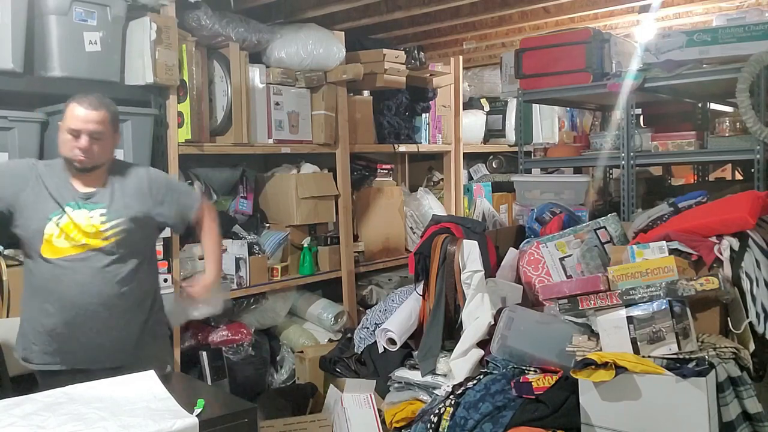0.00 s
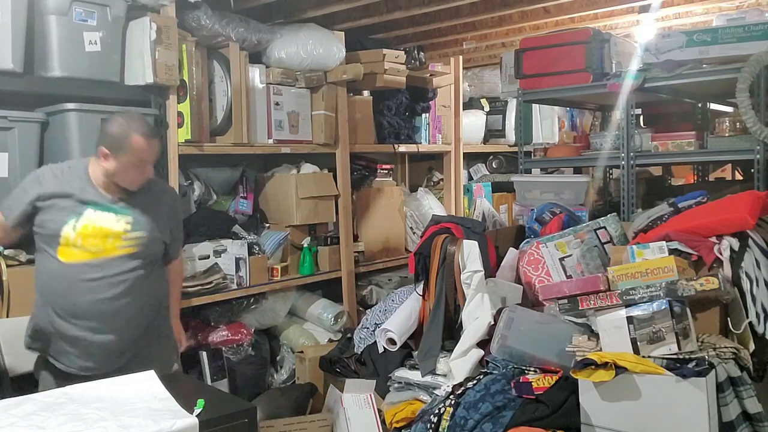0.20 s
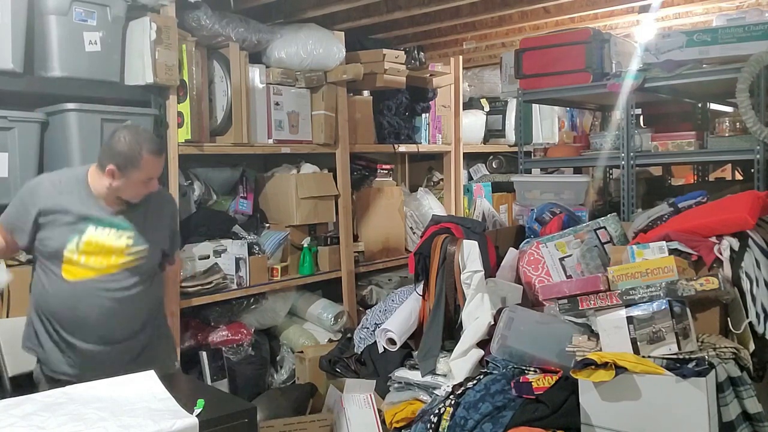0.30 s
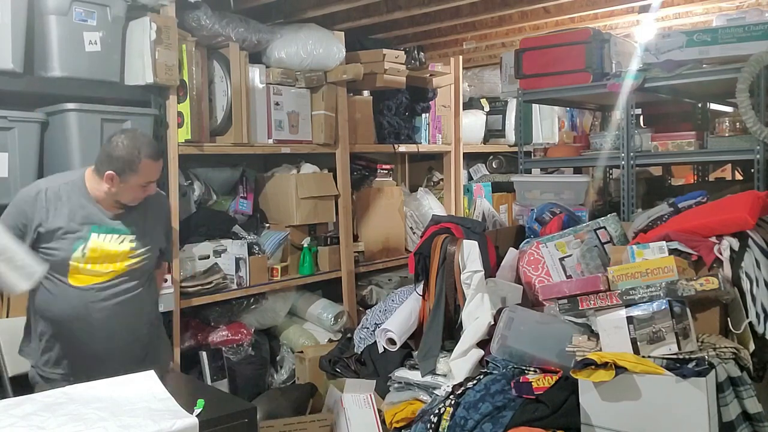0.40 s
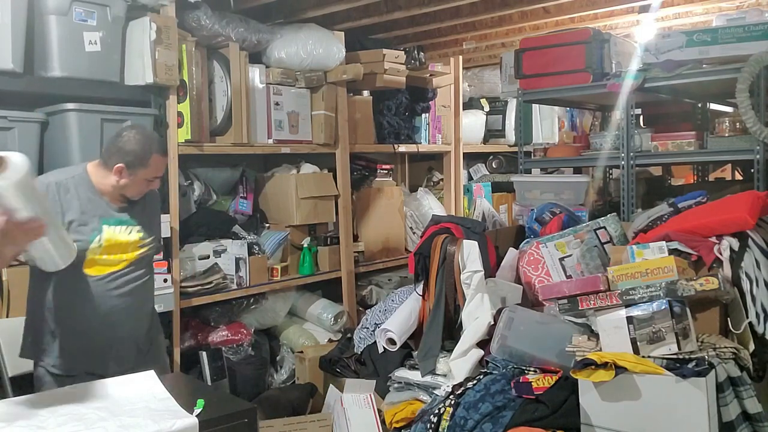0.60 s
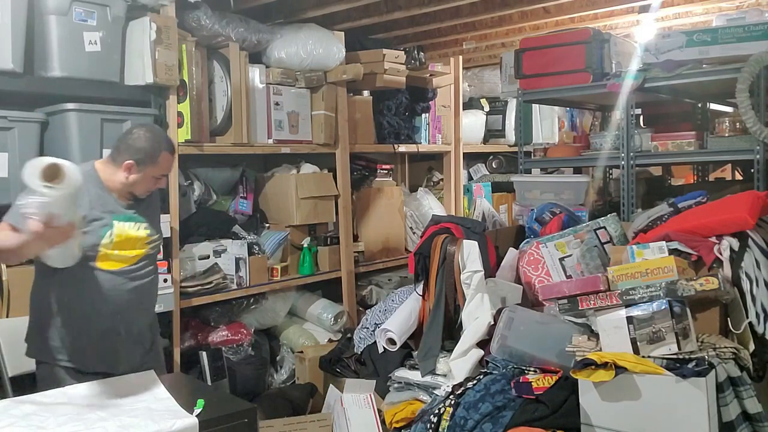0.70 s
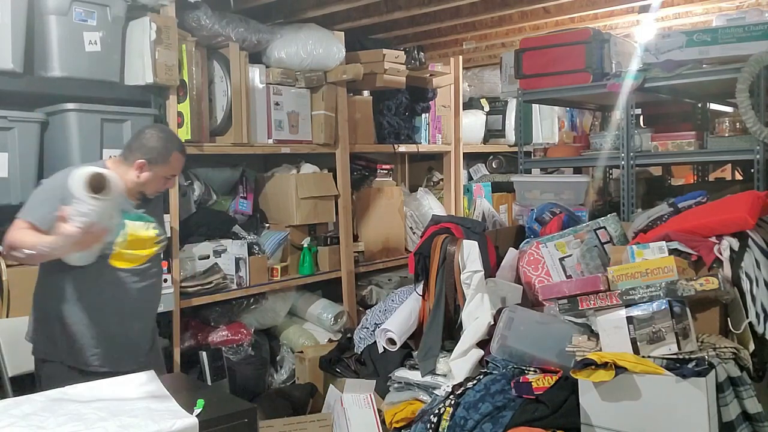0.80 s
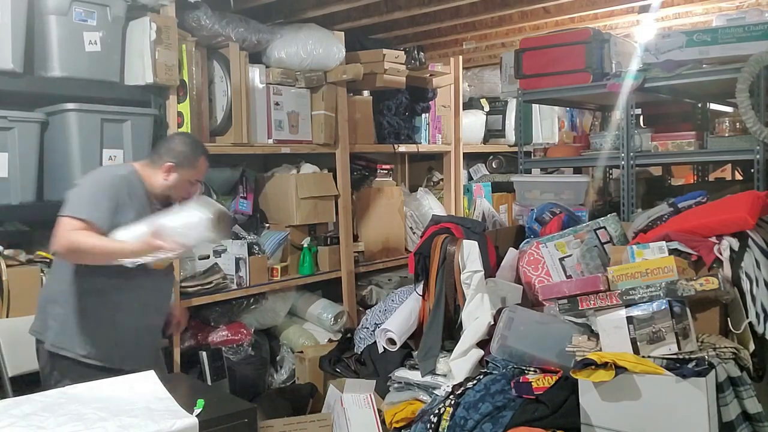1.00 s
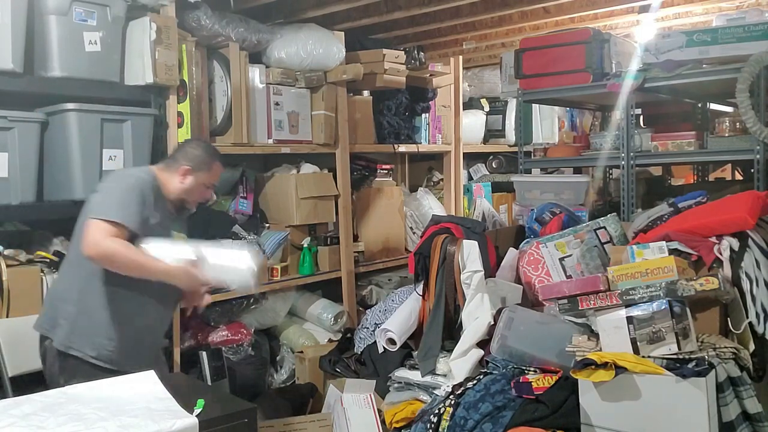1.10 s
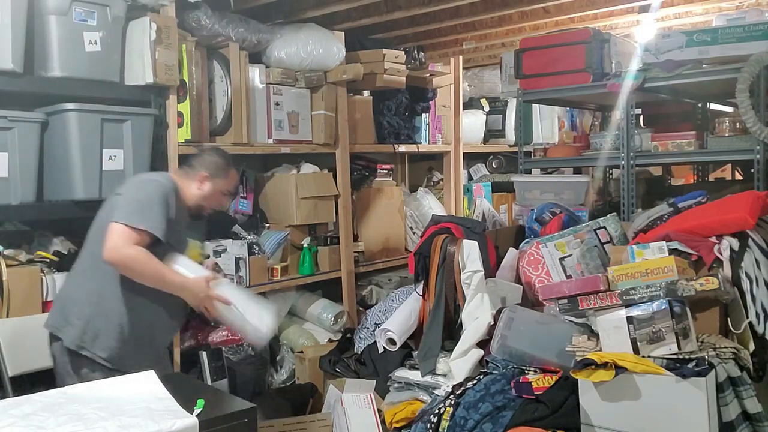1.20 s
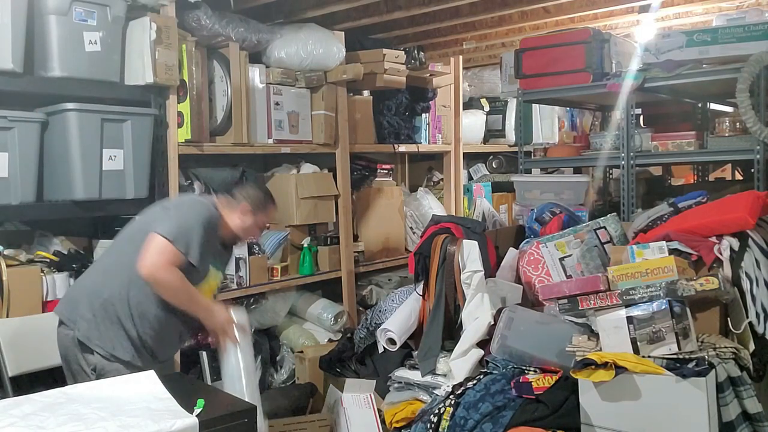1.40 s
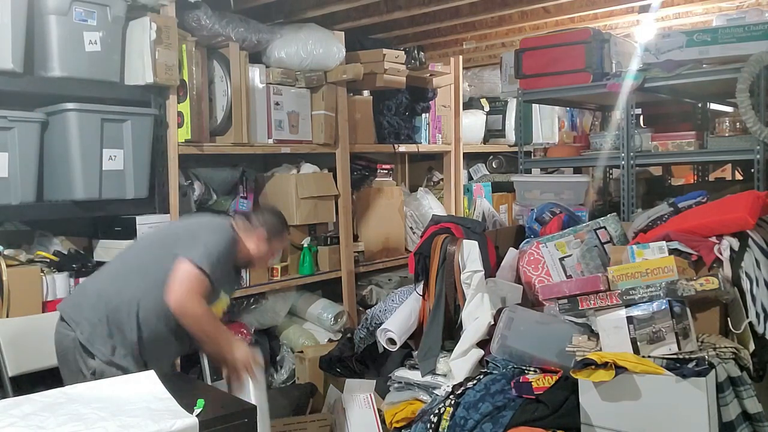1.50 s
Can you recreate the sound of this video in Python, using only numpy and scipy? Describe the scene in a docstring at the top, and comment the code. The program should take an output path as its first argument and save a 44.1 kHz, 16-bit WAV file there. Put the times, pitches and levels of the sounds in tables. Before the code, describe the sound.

A glass plate shatters after a brief swish of wrapping; a ringing crash, a heavy thud as the pieces land, then bouncing shards thinning out, close in a small cluttered storage room with faint fan hum.

```python
"""In a cluttered storage room a glass plate shatters: a dense crash in which the largest piece rings on,
then a heavy thud as the wreck lands, and shards that bounce and clink ever more thinly.
Glass is made of dying sine tones and gritty noise, knocks of tones and noise around one pitch.
Coloured noise gives the swish of wrapping before and after, a dull rumble and room air;
a fan is a faint, wavering sine hum."""
import sys
import numpy as np
from scipy import signal
from scipy.fft import rfft, irfft
from scipy.io import wavfile
from scipy.ndimage import uniform_filter1d

SR = 44100
rng = np.random.default_rng(int(sys.argv[2]) if len(sys.argv) > 2 else 0)


def waveform_to_disk(signal):
    """Save audio, clipped to [-1, 1], as 16-bit WAV at the path in sys.argv[1]."""
    frames = np.transpose(np.atleast_2d(signal))
    scaled = np.clip(frames, -1, 1) * 32767
    samples = np.round(scaled).astype(np.int16)
    wavfile.write(sys.argv[1], SR, samples)


N = 68355
TIME = np.arange(N) / SR  # seconds since the scene began
AGE = TIME[:2 ** 15]  # seconds since a single sound began
CUTOFF_HZ = 15900
SPREAD = 0.25  # usual strength of what differs between the ears, against what they share
ATTACK_S = .0004  # time constant of the onset of a struck sound

# Glass striking and cracking. Each row: start in seconds, level in dB, body level in dB against it,
# treble level in dB against it, basic t60 (time to fall by 60 dB) in seconds.
CLINKS = [(0.227, -21.5, -6.5, -3, 0.22), (0.232, -31, 10.5, 11, 0.27), (.243, -24, 6.5, 10, 0.023),
          (0.254, -16, -1.5, 1.5, 0.13), (0.265, -21, -2, 4, 0.078), (.277, -25.5, 6, 12, 0.1),
          (.294, -20, 2, 2, 0.15), (0.303, -21.5, -23, 6.5, 0.18), (0.3081, -16, -5.5, 3, 0.054),
          (.311, -15.5, 0, -2, 0.023), (.3195, -22.5, 6.5, 6.5, 0.14), (0.333, -18, -25, -10, 0.16),
          (0.3428, -27.5, 13.5, -6, 0.076), (.3485, -21.5, 13, 9, 0.031), (0.352, -19.5, 5.5, 2.5, 0.031),
          (.365, -29.5, -31, 2, 0.41), (.388, -22.5, -12, 2, 0.056), (0.403, -19, -11, 1.5, 0.042),
          (0.429, -35, 2, -8, 0.12), (0.447, -34, -15, -6, .1), (.459, -30, -4, 7.5, 0.063),
          (0.472, -17.5, -8, -0.5, 0.11), (0.477, -25, 2, 6, 0.14), (0.494, -25.5, -3, 4, 0.14),
          (.511, -25.5, -27, -3, 0.093), (0.538, -40, 10.5, 2, 0.45), (0.5554, -15.5, -6.5, -16.5, 0.035),
          (.592, -34.5, 0, 3, 0.061), (0.613, -30, -18, -6.5, 0.12), (0.6322, -25.5, -14, -1.5, 0.037),
          (.657, -38, -25, 4, 0.045), (0.68, -28, -7, -1, 0.033), (0.6848, -23.5, -13.5, -6.5, 0.064),
          (0.704, -44.5, 2, 3.5, 0.35), (0.7362, -20, -13, -10.5, 0.064), (0.753, -33, -8.5, -6.5, 0.21),
          (0.7893, -27.5, -46, -13.5, 0.12), (.812, -37, -3, -5, 0.11), (0.871, -42.5, -16, 6, 0.084),
          (.878, -38, -7, 5, 0.049), (0.909, -42.5, -14, 0.5, 0.18), (.943, -32, -22, -4, 0.15),
          (0.995, -37, -24, 1, 0.075), (1.041, -38.5, -26, -35, 0.074), (1.06, -37.5, -7, 4, 0.072),
          (1.073, -27.5, -23, -4, 0.089), (1.0995, -25.5, -21, -12, 0.041), (1.134, -50.5, 2.5, -18, 0.044),
          (1.142, -31.5, -12, -7.5, 0.049), (1.2278, -45, -10, -4, 0.064), (1.252, -41, -18, -22, 0.035),
          (1.301, -44, -29, -0.5, 0.061), (1.4697, -48, -27, -4.5, 0.22), (1.498, -43.5, -23, -12, 0.083),
          (1.5286, -51.5, -22, 7.5, 0.12)]


def amp(db):
    """Turns decibels into a gain."""
    return 10 ** (np.asarray(db) / 20)


def unit(x):
    """Scales a sound to an rms (average strength) of 1."""
    return x / np.sqrt(np.mean(x ** 2) + 1e-20)


def read(points, hz):
    """Reads a curve of (Hz, value) points, with straight lines over log frequency."""
    point_hz, value = np.transpose(points)
    return np.interp(np.log(hz + 1), np.log(point_hz), value)


def follow(points):
    """Turns (seconds, dB) points into a gain that moves over the whole scene."""
    return amp(np.interp(TIME, *np.transpose(points)))


def add(mix, s, sound):
    """Mixes a sound in at s seconds, cut off where the scene ends."""
    part = mix[:, max(round(s * SR), 0):][:, :sound.shape[-1]]
    part += sound[..., :part.shape[1]]


def colour(x, octave_db):
    """Filters white noise so that each octave gets the dB that octave_db gives for its frequency."""
    hz = np.fft.rfftfreq(x.shape[-1], 1 / SR)
    # white noise is stronger in higher octaves, as they are wider: the root evens this out
    gain = amp(octave_db(hz)) * np.sqrt(SR / np.sqrt(2) / (hz + 10))
    return irfft(rfft(x) * gain, x.shape[-1])


def pair(mid, side, spread=SPREAD):
    """Makes left and right from a common and a differing part."""
    return np.array([mid + spread * side, mid - spread * side]) / np.hypot(1, spread)


def noise(size, spread=SPREAD):
    """Makes white noise that differs between the ears by spread."""
    return pair(*rng.standard_normal((2, size)), spread)


def decay(t60):
    """Rises quickly, then falls exponentially by 60 dB every t60 seconds."""
    return (1 - np.exp(-AGE / ATTACK_S)) * np.exp(-np.log(1000) * AGE / max(t60, 1e-3))


def mode(hz, db, t60):
    """One way a struck object vibrates: a dying sine tone, slightly out of step between the ears."""
    lag = rng.choice([-1, 1]) * SPREAD * np.array([[1], [-1]])
    return np.sqrt(2) * amp(db) * decay(t60) * np.sin(2 * np.pi * hz * AGE + lag)


def fan():
    """A sine hum that wavers in pitch and strength, over the quiet noise of room air."""
    # The wavering hum. Each row: time in seconds, pitch in Hz, level in dB.
    hum_path = [(0, 406, -48), (.03, 402, -55), (.1, 383, -51), (.14, 395, -59), (.2, 390, -54),
                (1.19, 386, -54), (1.3, 405, -56), (1.45, 398, -55), (1.55, 420, -53)]
    # Room air. Each row: frequency in Hz, level in dB per octave.
    air_colour = [(25, -86), (60, -89), (250, -83), (550, -58), (1000, -94), (3000, -82), (8000, -97),
                  (16000, -95)]
    flutter_depth, flutter_hz, air_spread = .55, 28, 0.26
    when, hz, db = np.transpose(hum_path)
    # slow noise: little is left of it above flutter_hz
    flutter = unit(colour(noise(N), lambda f: -10 * np.log10(1 + (f / flutter_hz) ** 6)))
    strength = (1 + flutter_depth * flutter) / np.hypot(1, flutter_depth)
    phase = 2 * np.pi * np.cumsum(np.interp(TIME, when, hz)) / SR
    hum = np.sqrt(2) * amp(np.interp(TIME, when, db)) * strength * np.sin(phase)
    return hum + colour(noise(N, air_spread), lambda f: read(air_colour, f))


def wrapping():
    """Wrapping material slides and swishes: noise whose level trembles finely."""
    # The swishes. Each row: time in seconds, level in dB.
    swish_level = [(0, -57.5), (.04, -60.5), (.075, -51), (.103, -45.5), (.125, -60.5), (.16, -67.5),
                   (.22, -81.5), (1.3, -73), (1.42, -63.5), (1.5, -73), (1.55, -91)]
    # Their tone. Each row: frequency in Hz, level in dB per octave.
    swish_colour = [(100, -28), (500, -3.5), (1300, 1.5), (2500, 2.5), (6000, 6.5), (11000, 6),
                    (16000, 7.5)]
    spread, grain_db = 0.85, 1
    grain = unit(uniform_filter1d(rng.standard_normal(N), size=90))  # smoothed over about 2 ms
    swish = colour(noise(N, spread), lambda f: read(swish_colour, f))
    return swish * follow(swish_level) * amp(grain_db * grain)


def rumble():
    """Things shift on the floor from the crash on: low noise that rises and fades."""
    # The rumble. Each row: time in seconds, level in dB.
    rumble_level = [(0, -92), (.22, -88), (.3, -46), (.6, -52.5), (.9, -53.5), (1.15, -57), (1.55, -64.5)]
    # Its tone. Each row: frequency in Hz, level in dB per octave.
    rumble_colour = [(25, -11), (70, -11), (150, -2.5), (260, 0.5), (600, -10.5), (2000, -32.5)]
    return colour(noise(N), lambda f: read(rumble_colour, f)) * follow(rumble_level)


def splinters(t60=0.016, count=24):
    """Fine splinters patter at random: short ticks in groups, each group with a pitch of its own."""
    # The patter. Each row: time in seconds, level in dB.
    patter_level = [(.23, -34.5), (.3, -37.5), (.4, -40), (.52, -33), (.62, -47), (.8, -42), (.86, -53),
                    (1.1, -54), (1.25, -68.5), (1.55, -67)]
    # Its tone. Each row: frequency in Hz, change in dB per octave.
    patter_colour = [(100, -12.5), (400, -2), (1200, 2.5), (4500, -4), (10000, -3), (16000, -26)]
    ticks_per_s, scatter_db = 560, 4  # of all groups together; random strength of a tick
    tone_db, ring_s = -7.5, 0.066  # level and t60 of the pitched part before the patter is coloured
    out = np.zeros((2, N))
    for _ in range(count):
        strength = amp(scatter_db * np.minimum(rng.exponential(1, N), 3))
        ticks = (rng.random(N) < ticks_per_s / count / SR) * strength
        tone = mode(rng.uniform(1976, 14000), tone_db, ring_s)
        tick = noise(len(AGE), spread=0.19) * decay(t60) + tone
        out += signal.oaconvolve(ticks[None], tick, axes=1)[:, :N]
    after_first_crack = TIME > CLINKS[0][0]
    patter = colour(unit(out), lambda f: read(patter_colour, f))
    return patter * follow(patter_level) * after_first_crack


def snaps(order=3):
    """Light debris snaps: a sharp click and a brief rattle, both through one broad resonance."""
    # Dry snaps. Each row: start in seconds, level in dB, centre in Hz, t60 of the rattle in seconds.
    snap_rows = [(.4715, -23, 1150, .07), (.815, -41, 1500, .04), (.8557, -33.5, 950, .035),
                 (1.004, -40.5, 1100, .055), (1.0615, -35.5, 1050, .05), (1.178, -40, 1150, .03),
                 (1.2635, -45.5, 880, .04), (1.3825, -43, 1250, .055)]
    half_width_octaves, click_db = .95, 20.5
    out = np.zeros((2, N))
    for s, db, hz, t60 in snap_rows:
        click = amp(click_db) * (AGE == 0)  # a single sample
        drive = noise(len(AGE)) * decay(t60) + click
        low, high = hz / 2 ** half_width_octaves, hz * 2 ** half_width_octaves
        resonance = signal.butter(order, [low, high], "bandpass", fs=SR)
        gain = amp(db) * np.sqrt(SR / 2 / (high - low))  # makes up for the noise outside the band
        add(out, s, gain * signal.lfilter(*resonance, drive))
    return out


def knock(db, hz, t60):
    """A dull bump: the short push of contact, a ring at the centre pitch and a rattle around it."""
    half_width_octaves, skirt_db = 0.97, 15.5  # width of the rattle's hump, steepness of its flanks
    push_db, push_cycles = 3, 9.4  # level against the knock; t60 in cycles of the pitch
    ring_db, rattle_db = -4.5, -2  # levels against the knock
    low_cut = 0.38  # part of the centre pitch under which a knock gives little

    def hump(f):
        octaves = np.log2((f + 1) / hz)
        flank = skirt_db * np.log10(1 + (octaves / half_width_octaves) ** 2)
        return db - flank - 6 * np.maximum(octaves - 2, 0)  # steeper from two octaves up

    rattle = amp(rattle_db) * colour(noise(len(AGE)), hump) * decay(t60)
    push = mode(hz, db + push_db, push_cycles / hz)
    bump = push + mode(hz, db + ring_db, t60) + rattle
    return signal.lfilter(*signal.butter(2, hz * low_cut, "highpass", fs=SR), bump)


def knocks():
    """Things land or shift with dull bumps; the heavy landing sets many modes of a surface ringing."""
    # Dull knocks. Each row: start in seconds, level in dB, centre pitch in Hz, t60 in seconds.
    knock_rows = [(.255, -29.5, 264, 0.22), (0.303, -31, 243, 0.25), (0.337, -42.5, 70, 0.19),
                  (0.344, -23, 1436, 0.23), (0.37, -23, 680, 0.054), (.374, -22, 1440, 0.044),
                  (0.404, -43, 158, 0.12), (0.4688, -14, 440, 0.034), (.479, -28, 140.4, 0.22),
                  (.4745, -16.5, 726, 0.049), (.482, -22.5, 560, 0.025), (0.489, -21.5, 970, 0.064),
                  (0.54, -31.5, 810, .06), (0.548, -35, 259, 0.14), (0.563, -32, 516, 0.15),
                  (.724, -40, 205, 0.098), (0.738, -31, 775, 0.084), (0.789, -43, 436, 0.18),
                  (0.905, -37.5, 644, .04), (0.916, -40, 296, 0.075), (1.008, -36, 627, 0.03),
                  (1.022, -34, 526, 0.018), (1.062, -51, 445, 0.056), (1.062, -51.5, 160, 0.089),
                  (1.14, -53.5, 150, 0.15), (1.167, -46, 452, 0.074), (1.191, -45, 570, 0.02),
                  (1.234, -49, 166, 0.14), (1.318, -53.5, 165, 0.047), (1.32, -50.5, 610, 0.05)]
    # Modes of the surface that takes the fall. Each row: pitch in Hz, relative level in dB, t60 in seconds.
    surface_modes = [(105.4, -4, 0.18), (146.5, -0.5, 0.16), (184, 6.5, 0.054), (251, -5.5, 0.066),
                     (395, -4.5, 0.098), (465, -20, 0.044), (541, -4.5, 0.12), (624, -10.5, 0.048),
                     (697, 1, 0.084), (753, -2.5, 0.1), (871, -3, 0.1), (1261, -5, .09)]
    thud_s, thud_db = .4705, -18.5
    out = np.zeros((2, N))
    for s, *bump in knock_rows:
        add(out, s, knock(*bump))
    # every other mode starts upside down
    thud = sum((-1) ** k * mode(*row) for k, row in enumerate(surface_modes))
    add(out, thud_s, amp(thud_db) * thud)
    return out


def crackle(size):
    """An uneven train of tiny fractures: a gain of rms 1 that jumps at random moments."""
    scatter_db, grain_s = 5.5, .0007  # spread of the jumps, average time between them
    steps = np.cumsum(rng.random(size) < 1 / (grain_s * SR))
    return unit(amp(scatter_db * np.clip(rng.standard_normal(size + 1), -2, 2))[steps])


def shard_modes(count=52, scatter_db=4.5):
    """The many unrelated modes of one shard: steady tones of random strength across the spectrum."""
    lines = np.zeros((2, len(AGE) // 2 + 1), complex)
    hz = 1200 + (np.arange(count) + rng.random(count)) / count * (CUTOFF_HZ - 1200)
    strength = amp(scatter_db * rng.standard_normal(count))
    phase = 2 * np.pi * rng.random((2, count))
    lines[:, (hz * len(AGE) / SR).astype(int)] = strength * np.exp(1j * phase)
    return unit(irfft(lines))


def clink(s, db, body_db, treble_db, t60):
    """A blow on glass: a sharp crack, a gritty scrape and the ringing modes of one shard."""
    # Where the shards lie; the landing throws them wide.
    # Each row: time in seconds, spread from 0 to 1, left minus right in dB.
    scatter_path = [(.23, 0.19, 1.5), (.44, 0, 0.4), (.472, 0.97, 0), (.495, 0.7, -3), (0.513, 0.35, 9),
                    (.554, 0.17, -3), (.6, 0.14, 1), (1.55, 0.25, -1)]
    bass_db, low_mid_db, top_db = -37, -14, -8  # first two against the body, last against the treble
    ring_share = .6  # the modes' part of the power, the rest is scrape
    ring_life, grit_life = 0.66, 0.98  # decay times of modes and scrape, as parts of the blow's t60
    crack_db, crack_t60_s = -0.5, 0.0093
    when, spreads, pans_db = np.transpose(scatter_path)
    spread, pan_db = np.interp(s, when, spreads), np.interp(s, when, pans_db)
    body, treble = db + body_db, db + treble_db
    shape = [(100, body + bass_db), (450, body + low_mid_db), (1110, body),
             (4280, db), (11100, treble), (15000, treble + top_db)]  # (Hz, dB per octave)
    ring = pair(*shard_modes(), spread)
    grit = noise(len(AGE), spread) * crackle(len(AGE))
    crack = noise(len(AGE), spread) * crackle(len(AGE))
    ring, grit, crack = colour(np.array([ring, grit, crack]), lambda f: read(shape, f))
    sound = np.sqrt(ring_share) * ring * decay(t60 * ring_life)
    sound += np.sqrt(1 - ring_share) * grit * decay(t60 * grit_life)
    sound += amp(crack_db) * crack * decay(crack_t60_s)
    return sound * amp([[pan_db / 2], [-pan_db / 2]])


def glass():
    """The plate bursts, its largest piece rings in its own modes and the shards bounce."""
    # Pitches of the largest piece's modes in Hz.
    plate_hz = [3518, 4030, 5152, 5741, 6366, 6966, 7623, 8332, 8485, 8986, 9591, 10070, 10983, 12099,
                13363]
    # The same modes in the same order. Each row: relative level in dB, t60 in seconds.
    plate_modes = [(-4.5, 0.59), (-8, 0.51), (2.5, 0.42), (-10, 0.9), (-1.5, 0.35), (-4, 0.2), (-25, 0.79),
                   (-12, 0.225), (-4, .55), (-6, 0.49), (-5, 0.55), (-4.5, 0.57), (-5.5, 0.69), (-8, 0.19),
                   (-6, 0.28)]
    # Clear notes of single shards. Each row: start in seconds, pitch in Hz, level in dB, t60 in seconds.
    shard_notes = [(.233, 11630, -17.5, 0.079), (.234, 12300, -20, 0.088), (0.23, 8500, -21.5, 0.14),
                   (.295, 2415, -14, 0.024), (0.405, 7623, -28, 0.067), (0.458, 8130, -23, 0.056),
                   (0.516, 3890, -34, 0.3), (0.577, 6070, -37.5, 0.19), (0.634, 2480, -28, 0.051),
                   (0.635, 10400, -30.5, 0.068), (.686, 3670, -36, 0.23), (.686, 1900, -27.5, 0.035),
                   (0.633, 5650, -29, 0.06), (.633, 7260, -36, 0.049), (0.686, 6150, -34, 0.081),
                   (0.7, 6120, -25.5, 0.069), (.737, 2320, -34.5, 0.15), (0.735, 7270, -33, 0.11),
                   (0.875, 4170, -38.5, 0.1), (.943, 2316, -45, 0.17), (0.944, 2645, -44.5, 0.22),
                   (0.944, 4950, -35.5, 0.13), (0.943, 6970, -30.5, 0.056), (1.063, 10030, -26.5, 0.062),
                   (1.062, 13700, -33, 0.052), (1.061, 3320, -38, 0.14), (1.063, 6990, -31.5, 0.073),
                   (1.143, 5550, -37.5, 0.067)]
    plate_s, plate_db = .255, -21
    out = np.zeros((2, N))
    for s, *blow in CLINKS:
        add(out, s, clink(s, *blow))
    plate = sum(mode(hz, *row) for hz, row in zip(plate_hz, plate_modes))
    add(out, plate_s, amp(plate_db) * plate)
    for s, *note in shard_notes:
        add(out, s, mode(*note))
    return out


def room(x):
    """Adds quick reflections from nearby clutter and a short tail that dies at its own rate per pitch."""
    # How fast the tail dies. Each row: frequency in Hz, t60 in seconds.
    tail_t60 = [(80, 0.41), (300, 0.21), (1500, 0.21), (6000, 0.1), (15000, 0.16)]
    early_db, early_t60_s, tail_db = -22, 0.053, -22.5
    shape = (2, 2, len(AGE))  # early and tail, each for two ears
    # sparse random reflections, none in the first 2 ms
    early, tail = rng.standard_normal(shape) * (rng.random(shape) < .1) * (AGE > .002)
    hz, t, bands = signal.stft(tail, SR, nperseg=256)
    fall = np.exp(-np.log(1000) * t / read(tail_t60, hz)[:, None])
    tail = signal.istft(bands * fall, SR)[1][:, :len(AGE)]
    echo = amp(early_db) * unit(early * decay(early_t60_s)) + amp(tail_db) * unit(tail)
    return x + signal.fftconvolve(x, echo / np.sqrt(len(AGE)), axes=1)[:, :N]


def scene():
    """Mixes everything and sets how wide each pitch range sounds: narrower near 150 Hz, wide in the treble."""
    # Change of the left-right difference. Each row: frequency in Hz, gain in dB.
    width_curve = [(60, 1), (150, -5.5), (500, 1.5), (1500, -1.5), (4500, 1.5), (9000, 2.5), (14000, 3.5)]
    events = glass() + knocks() + snaps() + splinters() + wrapping() + rumble()
    left, right = room(events) + fan()
    mid = (left + right) / 2
    width = amp(read(width_curve, np.fft.rfftfreq(N, 1 / SR)))
    side = irfft(rfft((left - right) / 2) * width, N)
    return np.array([mid + side, mid - side])


def record(dry):
    """The microphone's bass roll-off, soft overload on the highest peaks, then the band limit."""
    thin = signal.lfilter(*signal.butter(2, 45, "highpass", fs=SR), dry)
    held = thin / (1 + thin ** 6) ** (1 / 6)  # bends gently towards full scale
    low_pass = signal.firwin(511, CUTOFF_HZ, window=("kaiser", 9), fs=SR)
    return signal.oaconvolve(held, low_pass[None], "same")


dry = scene()
out = record(dry)
waveform_to_disk(out)
```